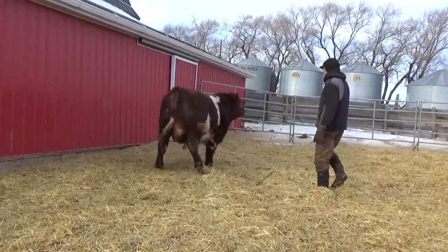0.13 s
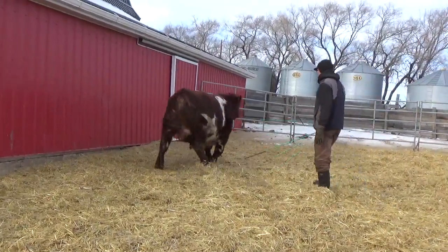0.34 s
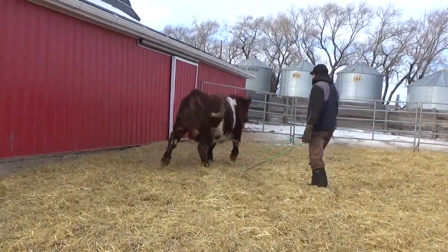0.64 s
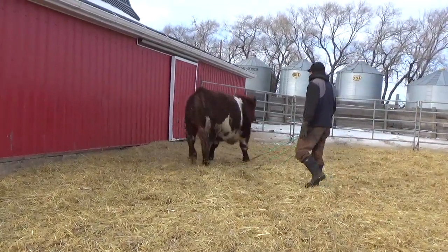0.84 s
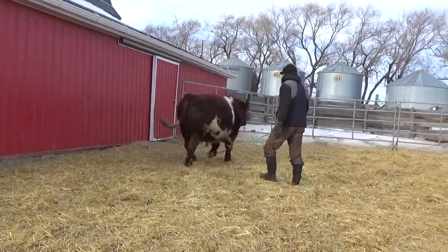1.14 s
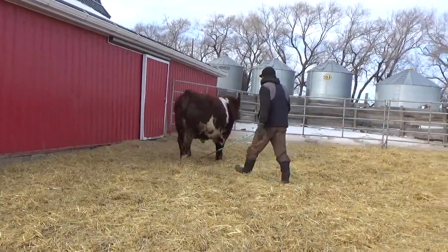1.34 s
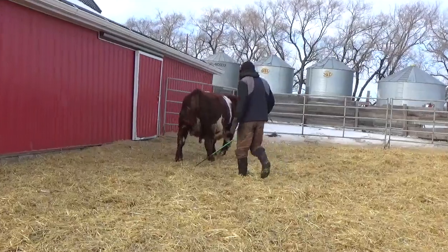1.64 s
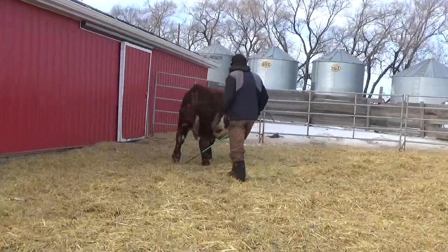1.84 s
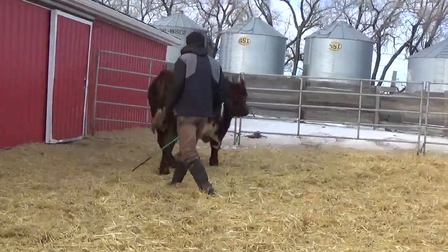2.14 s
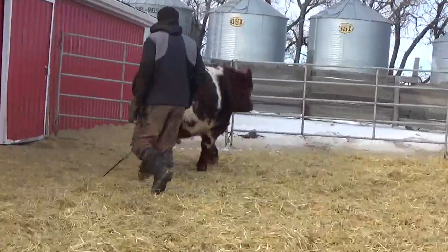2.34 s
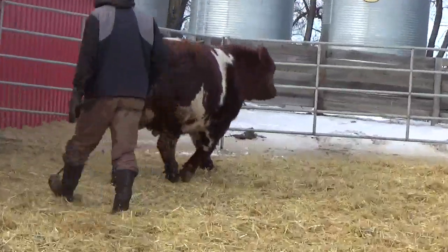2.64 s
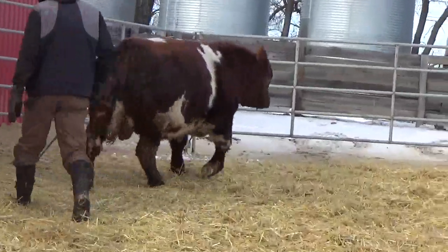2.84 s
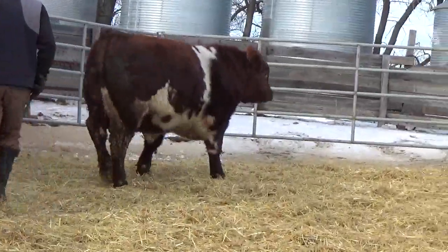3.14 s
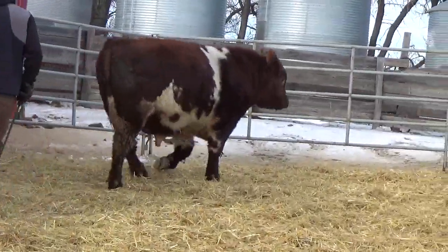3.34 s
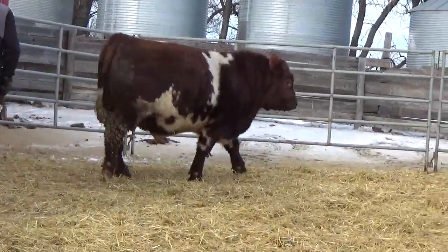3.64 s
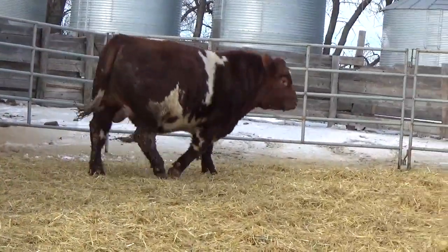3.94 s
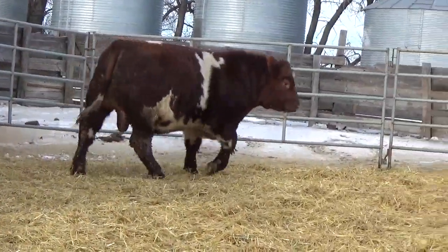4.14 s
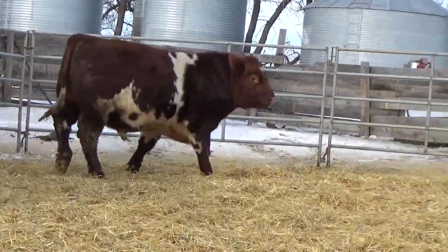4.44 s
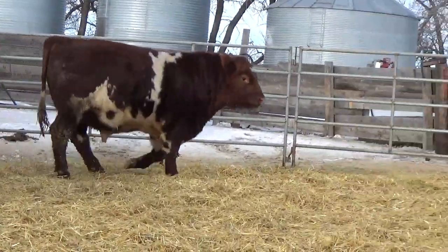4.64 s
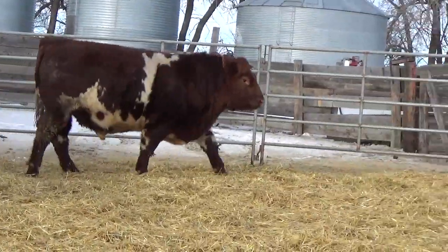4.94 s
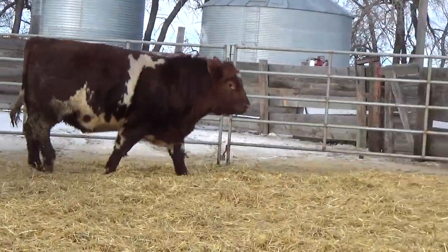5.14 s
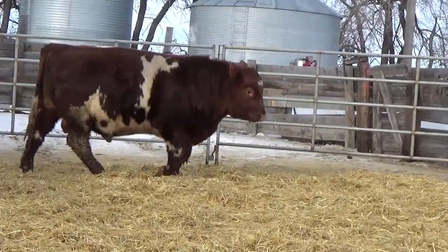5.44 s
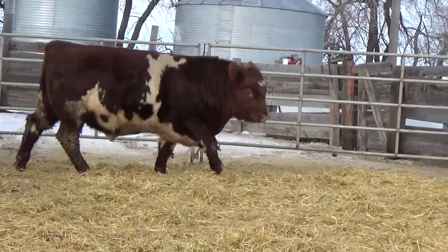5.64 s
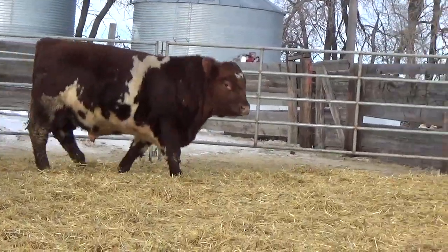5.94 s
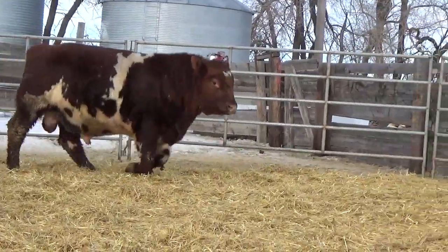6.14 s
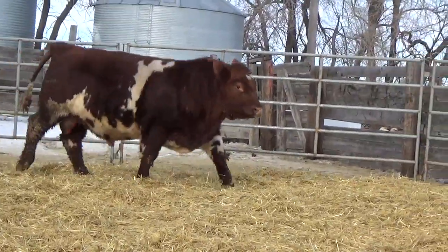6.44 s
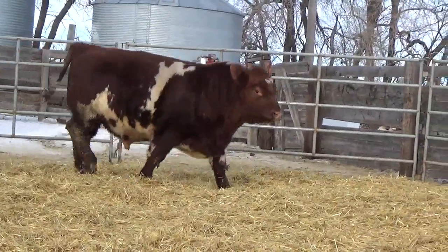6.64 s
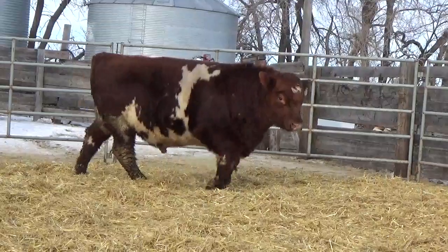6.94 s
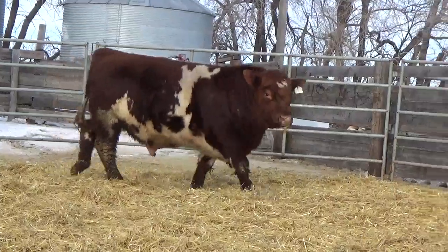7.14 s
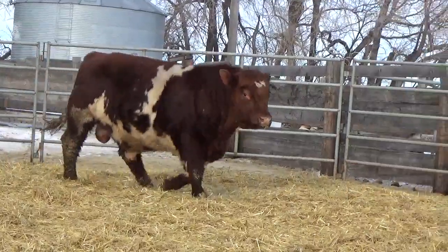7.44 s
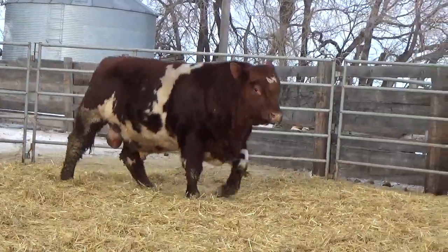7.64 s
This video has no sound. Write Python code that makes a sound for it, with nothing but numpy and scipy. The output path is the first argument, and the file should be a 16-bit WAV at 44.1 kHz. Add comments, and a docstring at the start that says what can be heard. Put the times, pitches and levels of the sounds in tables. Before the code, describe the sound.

A quiet outdoor yard, in stereo, with light wind bumping the microphone. From 0 s, hooves and boots rustle dry straw, with brittle stalks snapping, thickest around 1.3 to 2 s. A stick swishes downward just before 1 s. From 1 to 1.7 s a far bull, left and echoing off sheet-metal walls, slides from a low tone up to a high hollow hoot. A short falling call comes at 2.9 s. From 3.5 to 4.8 s it holds a long, wavering, nearly pure bugle; a sharp rail knock clicks at 4.3 s. Underneath, a nearer bull on the right lows softly, then opens into a rich, full bellow from 4.9 to 5.7 s, ending abruptly, as the far one drops in pitch around 5 s. After a lull of straw steps and a loud snap at 6.2 s, hoarse far calls fall at 6.4 to 6.9 s, then rise and fall until 7.45 s. Faint peeps occur; rustling continues to about 8 s.

```python
"""A straw-bedded yard between sheet-metal walls, in stereo: a far bull bugles in high, nearly pure slides of a few
partials, left and echoing; a nearer one, to the right and drier, lows and rises to a full bellow of many partials.
Hooves and boots rustle the straw (swelling noise bands) and snap stalks (dying noise cracks). A rail is knocked
(ringing modes), a stick swishes once (gliding noise band), something peeps faintly (sine slides), and light wind
touches the microphone (low noise in gusts) over a quiet noise floor."""
import sys
import numpy as np
from scipy import signal
from scipy.io import wavfile
from scipy.ndimage import uniform_filter1d

SR = 44100
rng = np.random.default_rng(int(sys.argv[2]) if len(sys.argv) > 2 else 0)


def wrap_up_sound(samples):
    """Save the sound to the file named by the first command line argument, as 16-bit audio."""
    columns = np.atleast_2d(samples).T
    # keep every value between -1 and 1, then stretch to whole-number steps
    tamed = np.clip(columns, -1, 1)
    steps = np.round(tamed * 32767).astype(np.int16)
    wavfile.write(sys.argv[1], SR, steps)


def invert_db(x):
    """Field ratio 10**(x/20) for x, a level in decibels (scalar or array-like)."""
    u = np.asarray(x, float) / 20
    return 10 ** u


N = 344149


def rms_one(x):
    """Scale to rms 1."""
    return x / np.sqrt(np.mean(x ** 2) + 1e-20)


def in_time(rows):
    """Columns of a curve table at every sample."""
    s, *columns = np.transpose(rows)
    return [np.interp(np.arange(N) / SR, s, c) for c in columns]


def at_hz(points, hz):
    """Read a spectrum on a log-frequency axis."""
    table_hz, values = np.transpose(points)
    return np.interp(np.log(hz), np.log(table_hz), values)


def drift(rate, size=N):
    """Smooth random wander of rms 1: noise through two equal poles at rate (Hz), made every 20 samples."""
    r = np.exp(-40 * np.pi * rate / SR)
    noise = rng.standard_normal(size // 20 + 4002)
    slow = signal.lfilter([1], [1, -2 * r, r * r], noise)[4000:]   # the filter has settled
    return np.interp(np.arange(size) / 20, np.arange(len(slow)), rms_one(slow))


def band(x, low_hz, high_hz):
    """Butterworth band-pass."""
    return signal.sosfilt(signal.butter(2, [low_hz, high_hz], "band", fs=SR, output="sos"), x)


def resonance(x, hz, width):
    """Two-pole peak of gain 1, width in Hz."""
    r = np.exp(-np.pi * width / SR)
    zeros = [(1 - r * r) / 2, 0, (r * r - 1) / 2]
    poles = [1, -2 * r * np.cos(2 * np.pi * hz / SR), r * r]
    return signal.lfilter(zeros, poles, x + 1e-18)


def shaded(x, low_db, high_db, corner_hz):
    """Separate gains below and above a corner, as on the shaded side or off a wall."""
    low_part = signal.sosfilt(signal.butter(1, corner_hz, fs=SR, output="sos"), x)
    return invert_db(low_db) * low_part + invert_db(high_db) * (x - low_part)


# Likeness of left and right in the noise beds. Each row: frequency in Hz, likeness from 0 to 1.
LEFT_RIGHT_LIKENESS = [(60, 0.84), (170, 1), (490, 0.77), (1380, 0.42), (3940, 0.72), (11200, 0.89)]


def banded(spectrum, patchy_db, grain_db):
    """Half-octave bands of stereo noise with own level, flicker and likeness, and a shared graininess; rms 1."""
    out, edges = 0, 45 * 2 ** np.arange(0, 8.6, .5)
    white = rng.standard_normal((2, 2, N)) * invert_db(grain_db * drift(230))   # grains run across all bands
    for k, (low_hz, high_hz) in enumerate(zip(edges, edges[1:])):
        hz = np.sqrt(low_hz * high_hz)
        if at_hz(spectrum, hz) > -40:   # fainter bands are skipped
            mid, side = band(white[k % 2], low_hz, high_hz)
            alike = np.clip(at_hz(LEFT_RIGHT_LIKENESS, hz), 0, 1)
            gain = invert_db(at_hz(spectrum, hz) + patchy_db * drift(5.2))
            stereo = np.sqrt(1 + alike) * mid + np.sqrt(1 - alike) * side * [[1], [-1]]
            out = out + gain * stereo
    return rms_one(out)


# Noise floor of the yard. Each row: frequency in Hz, relative density in dB per Hz.
FLOOR_SPECTRUM = [(35, -48), (60, -6.5), (243, 4), (369, -7.5), (480, 0.5), (2120, -11), (2880, -12),
                  (6480, -10), (9000, -3.5), (11200, -31.5), (14600, -46), (22000, -120)]


def yard_floor():
    """Quiet, patchy noise of the open yard at -63.5 dB rms."""
    return invert_db(-63.5) * banded(FLOOR_SPECTRUM, patchy_db=5.0, grain_db=3.5)


# Gusts on the microphone. Each row: centre in seconds, peak in dB before flicker, swell in seconds (to 1/e).
GUSTS = [(.61, -75, .15), (1.74, -65.5, .1), (3.8, -76, 0.41), (4.55, -73, 0.29), (5.2, -66, 0.052),
         (6.3, -78.5, 0.25), (6.89, -82, 0.039), (7.12, -72, 0.092), (7.38, -67, 0.14)]
CALM_DB = -81.5   # wind between the gusts, before flicker


def wind():
    """Low noise, mostly alike on both sides, in bell-shaped swells over a calm bed; its level flickers."""
    t = np.arange(N) / SR
    swells = sum(invert_db(db) * np.exp(-((t - s) / swell) ** 2) for s, db, swell in GUSTS)
    flicker = invert_db(2.2 * drift(5.2))
    shared = band(band(rng.standard_normal(N), 36, 173), 39, 183)
    apart = band(rng.standard_normal((2, N)), 22, 100)
    return (invert_db(CALM_DB) + swells) * flicker * rms_one(shared + 0.11 * apart)


# Single echoes off the walls. Each row: delay in seconds, left level in dB, right level in dB.
WALL_ECHOES = [(.021, -8, -8.5), (.047, -10.5, -11), (.078, -13.5, -16), (.105, -18, -17),
               (.16, -22.5, -24.5), (.24, -23.5, -23)]
YARD_T60_S, WALL_CUT_HZ = 0.48, 1900   # decay of the lowest tones; low-pass on every round


def yard(x):
    """A few single echoes, then feedback delays that dull on every round."""
    out, dull = np.zeros((2, N)), np.exp(-2 * np.pi * WALL_CUT_HZ / SR)
    for delay_s, *sides_db in WALL_ECHOES:
        lag = round(delay_s * SR)
        out[:, lag:] += invert_db(sides_db)[:, None] * x[:N - lag]
    for k, lag in enumerate((rng.uniform(.04, .11, 12) * SR).astype(int)):
        loop, gain, state = x.copy(), invert_db(-60 * lag / SR / YARD_T60_S), [0.]
        for i in range(lag, N, lag):
            back, state = signal.lfilter([gain * (1 - dull)], [1, -dull], loop[i - lag:i], zi=state)
            loop[i:i + lag] += back[:N - i]
        sign = (-1) ** (k // 2)
        out[k % 2] += invert_db(-13.5) * (loop - x) * sign
    return out


# Faint peeps. Each row: start in seconds, length in seconds, start pitch in Hz, end pitch in Hz,
# level in dB before the wavering.
PEEPS = [(1.05, 0.065, 2860, 2850, -66), (2.4, 0.071, 2950, 2940, -67), (2.735, 0.059, 2950, 2800, -62.5),
         (3.43, 0.022, 490, 497, -53), (3.664, 0.145, 2470, 2330, -61), (6.218, 0.19, 2540, 2460, -66)]


def peeps():
    """Short sine slides of wavering level."""
    out = np.zeros(N)
    for s, length, start_hz, end_hz, level_db in PEEPS:
        size, at = round(length * SR), round(s * SR)
        phase = 2 * np.pi * np.cumsum(np.linspace(start_hz, end_hz, size)) / SR
        level = invert_db(level_db + 3.1 * drift(33, size=size))
        out[at:at + size] += level * np.hanning(size) ** .5 * np.sin(phase)
    return out


# The swung stick. Each row: time in seconds, band centre in Hz, level in dB before the band's weighting.
SWISH = [(.84, 4600, -74), (.875, 3930, -57), (.92, 2880, -62.5), (.95, 1490, -49.5), (.98, 875, -52),
         (1.0, 600, -65)]


def swish():
    """Air noise of a swung stick: a band, narrow above 2500 Hz, whose centre falls as the stick slows."""
    before = (0, SWISH[0][1], -120)
    after = (SWISH[-1][0] + .02, SWISH[-1][1], -120)
    hz, level_db = in_time([before, *SWISH, after])
    noise, out = rng.standard_normal(N), 0
    width = np.where(hz > 2500, .08, .7)   # in log frequency
    for c in np.geomspace(500, 5000, 20):
        weight = np.exp(-(np.log(hz / c) / width) ** 2)
        out = out + weight * rms_one(band(noise, c / 1.08, c * 1.077))
    return invert_db(level_db) * out


# Feet drag through and leave the straw. Each row: time in seconds, rustle peak in dB, rise and fall in
# seconds per 10 dB (their signs are ignored), crunch in dB against the rustle.
STEPS = [(0.0, -60.5, .02, 1.2, -7.5), (.32, -46, 0.1, 0.18, -14), (.82, -58, 0.04, 0.55, -3),
         (1.32, -50, 0.1, 0.2, -14), (1.52, -49, .08, 0.11, -10.5), (1.74, -50, 0.03, .04, -9.5),
         (2.0, -51.5, 0.26, 0.06, -18), (2.17, -59.5, 0.4, 0.2, -1.5), (2.32, -55, 0, 0.07, -3),
         (2.69, -55.5, 0.4, 0.13, -7.5), (2.85, -59.5, 0.13, 0.12, 1.5), (3.35, -57, -0.03, 0, -8),
         (3.5, -64, 0.06, .08, 1), (3.66, -56, .07, -0.33, -1), (3.73, -59, 0.07, .07, 2),
         (3.836, -54, .03, -0.15, -5), (3.93, -65, -0.7, 0.7, 1), (4.13, -65, 0.14, 0.16, 6.5),
         (4.5, -56.5, -0.15, 0, -5.5), (4.63, -56, -0.05, 0.2, -0.5), (5.15, -59, -0.6, .2, -6),
         (5.33, -54, .1, .17, 1), (5.6, -55.5, .06, .25, -5), (5.73, -56, -0.25, 0.1, -8),
         (5.9, -55.5, 0.2, 0.16, -6), (6.01, -52, -0.7, 0.01, -6.5), (6.099, -54, -0.03, 0.14, -6.5),
         (6.36, -57.5, 0, 0.1, -9), (6.75, -53.5, 0.1, 0.03, -15), (6.89, -58.5, 0.64, .12, -3),
         (7.14, -48.5, -0.06, -0.03, -8.5), (7.45, -56, 0.44, 0.7, -3)]
# Feet come down hard on the straw. Each row: time in seconds, rustle peak in dB, fall in seconds per 10 dB
# (its sign is ignored), crunch in dB against the rustle.
LANDINGS = [(.218, -44, .045, -21), (0.747, -45, 0.03, -21), (1.81, -54, 0.15, -7),
            (2.405, -51.5, 0.24, -16.5), (2.99, -57.5, 0.14, -8), (3.135, -54.5, 0.1, -3.5),
            (3.299, -59.5, -1.3, -8), (4.273, -53.5, 0.16, -8.5), (4.865, -54, 0.3, -7),
            (7.35, -51.5, 0.1, -13)]
LANDING_RISE_S = .004   # per 10 dB


def steps():
    """Levels of rustle and crunch: every step swells and fades straight in dB, steps add in power."""
    landings = [(s, db, LANDING_RISE_S, *rest) for s, db, *rest in LANDINGS]
    s, peak_db, rise, fall, crunch_db = np.transpose([*STEPS, *landings])[:, :, None]
    t = np.arange(0, N + 100, 100) / SR   # one level every 100 samples
    below_peak_db = 10 * np.maximum((s - t) / np.abs(rise), (t - s) / np.abs(fall))
    rustle_power = invert_db(peak_db - below_peak_db) ** 2
    crunch_power = rustle_power * invert_db(crunch_db) ** 2
    return [np.interp(np.arange(N) / SR, t, np.sqrt(p.sum(axis=0))) for p in (rustle_power, crunch_power)]


# Bright rustle of the straw. Each row: frequency in Hz, relative density in dB per Hz.
RUSTLE_SPECTRUM = [(2060, -25.5), (3500, -1.5), (4130, -13.5), (5290, 6.5), (9000, -0.5), (10600, 4),
                   (11200, -30), (14600, -48), (22000, -120)]
# Lower crunch of the straw. Each row: frequency in Hz, relative density in dB per Hz.
CRUNCH_SPECTRUM = [(300, -5), (700, 0), (1500, 1), (2500, -1), (4000, 2), (5500, -11.5), (11000, -14)]


def straw():
    """Stalks rub and crackle under the feet: grainy noise of two colours follows the steps."""
    rustle, crunch = steps()
    rubbed = rustle * banded(RUSTLE_SPECTRUM, patchy_db=1.64, grain_db=1.35)
    return rubbed + crunch * banded(CRUNCH_SPECTRUM, patchy_db=0.0, grain_db=1.5)


# Stalks snap under a step. Each row: time in seconds, crack peak in dB before panning, pitch in Hz,
# thud in dB against the crack's peak.
SNAPS = [(0.0964, -55, 2510, -8), (0.2169, -53, 5450, -30), (0.3798, -46.5, 5670, -2.5),
         (0.7452, -52, 6000, -28), (1.2606, -44, 1630, -14), (1.2955, -53, 3000, -14),
         (1.401, -40.5, 2620, -9), (1.4696, -37, 3050, -8), (1.8005, -46, 6060, -13),
         (1.8482, -37.5, 5050, -7), (1.9402, -42.5, 5000, 1.5), (2.1724, -46, 1530, -16),
         (2.3444, -50.5, 2820, 1), (2.4019, -47, 5550, -21), (2.9261, -42, 5870, -5.5),
         (3.1807, -44.5, 4960, -10), (3.8354, -46, 4000, -10), (4.128, -46, 1390, -22),
         (4.4074, -44, 3530, 2), (4.5034, -48, 1700, -22), (4.6129, -42, 3100, -23),
         (6.2053, -36, 3220, -30), (6.8718, -45, 1380, -21), (7.0823, -46.5, 1920, -9),
         (7.7169, -43.5, 1880, -12)]
SNAP_T60_S, SMALL_SNAPS = 0.021, 12


def snaps():
    """Each snap is a dying noise crack, coloured around its pitch, over the dull thud of the step."""
    out, t = np.zeros((2, N)), np.arange(SR // 10) / SR
    # weaker snaps fall at random: columns as in SNAPS, lowest values + ranges
    small = [0, -58.5, 1500, -25] + rng.random((SMALL_SNAPS, 4)) * [N / SR, 6, 4500, 25]
    for s, peak_db, hz, thud_db in [*SNAPS, *small]:
        burst = rng.standard_normal(len(t)) * invert_db(-60 * t / SNAP_T60_S)
        crack = band(burst, 0.55 * hz, 1.21 * hz) + 0.16 * band(burst, 1000, 5400)
        thud = band(burst, 140, 1550)
        snap = crack / np.abs(crack).max() + invert_db(thud_db) * thud / np.abs(thud).max()
        at = round(s * SR)
        side = invert_db(rng.normal(0, 4.3) * np.array([[1], [-1]]))   # random place, left to right
        out[:, at:at + len(t)] += (side * invert_db(peak_db) * snap)[:, :N - at]
    return out


# Modes of the rail. Each row: frequency in Hz, relative level in dB, time to fall 60 dB in seconds.
RAIL_MODES = [(934, 6, 0.039), (1482, -19, 0.037), (2480, -2, .025), (3850, -1, 0.013), (4700, -1, 0.012),
              (8000, -4, 0.01)]
KNOCK_S, KNOCK_DB = 4.3405, -24.5   # time of the blow; level that the touches and the crack lie below


def knock():
    """A hoof or the stick strikes a rail: a light touch, a sharp blow and two rebounds ring its modes."""
    out, t = np.zeros(N), np.arange(SR // 10) / SR
    ring = sum(invert_db(db - 60 * t / t60) * np.sin(2 * np.pi * hz * t) for hz, db, t60 in RAIL_MODES)
    for delay_s, touch_db in [(-.011, -10), (0, -1), (.0035, -13), (.014, -29)]:
        at = round((KNOCK_S + delay_s) * SR)
        out[at:at + len(t)] += invert_db(KNOCK_DB + touch_db) * ring / np.abs(ring).max()
    at = round(KNOCK_S * SR)
    splinter = band(rng.standard_normal(len(t)), 570, 4300)   # splintery crack of the blow
    out[at:at + len(t)] += invert_db(KNOCK_DB - 5 - 60 * t / 0.067) * splinter
    return out


def throat_noise(throat, slope_db, size):
    """Breath rings in each throat resonance, weighted by a slope in dB per octave; rms 1."""
    noise = rng.standard_normal(size)
    rings = [(-1) ** k * invert_db(slope_db * np.log2(hz)) * resonance(noise, hz, width)
             for k, (hz, width, _) in enumerate(throat)]
    return rms_one(sum(rings))


MOUTH_OPENS_S = 4.88, 5.25   # start and end of the opening
GLIDE_LOSS_DB = 1.1   # overtone slope lost per octave a second of glide


def voice(rows, throat, count, nose=(), wobble=0, boost=0):
    """Partials on the pitch, shaped by source slope and throat.

    Returns samples, phase, partials, envelope and any further columns of rows."""
    s, *columns = np.transpose(rows)
    span = np.arange(int(s[0] * SR), int(s[-1] * SR))
    t = span / SR
    hz, level_db, slope_db, *more = [np.interp(t, s, c) for c in columns]
    wobble = np.broadcast_to(wobble, N)[span]
    phase = 2 * np.pi * np.cumsum(hz * (1 + wobble * drift(40, size=len(t)))) / SR
    k = np.arange(1, count + 1)[:, None]
    closed = np.clip((MOUTH_OPENS_S[1] - t) / np.ptp(MOUTH_OPENS_S), 0, 1)
    shapes = [*throat, *[(centre, width, db * closed) for centre, width, db in nose]]
    glide = uniform_filter1d(np.abs(np.gradient(np.log2(hz))) * SR, size=600)   # octaves a second
    slope_db = slope_db - GLIDE_LOSS_DB * np.minimum(glide, 15)   # slack folds in a fast slide lose overtones
    lift_db = sum(db / (1 + (2 * (k * hz - centre) / width) ** 2) for centre, width, db in shapes)
    partial_db = lift_db - lift_db[0] + slope_db * np.log2(k)   # against the lowest partial
    partials = invert_db(partial_db) * np.sin(k * (phase + 0.256 * k))
    fade = np.clip(np.minimum(t - s[0], s[-1] - t) / 0.0043, 0, 1)
    return span, phase, partials, fade * invert_db(level_db + boost * lift_db[0]), more


# The near bull's call. Each row: time in seconds, pitch in Hz, lowest partial in dB before the mix,
# overtone slope in dB per octave before glide loss, breath in dB against the lowest partial.
NEAR_CALL = [(3.5, 84.1, -77, -0.5, -23), (3.75, 101.2, -67, -6, -28), (3.93, 109.3, -64, -5.5, -30),
             (4.11, 119.8, -66, -1, -28), (4.54, 132.2, -67, -1.5, -28), (4.72, 135.5, -65.5, 0, -28),
             (4.9, 151.8, -55, 0, -11), (5.01, 189.3, -41.5, -3.5, -16), (5.05, 209.1, -37.5, -5, -22),
             (5.11, 242.1, -37, -3, -43), (5.2, 276.4, -38, -4.5, -43), (5.3, 291.3, -39.5, -3, -17),
             (5.4, 292, -33.5, -3, -21.5), (5.55, 292.6, -31, -4, -20.5), (5.61, 276, -31, -2, -20),
             (5.63, 262.6, -24.5, -3.5, -26), (5.66, 221.2, -27, -1.5, -47), (5.68, 223.4, -34, -10.5, -40),
             (5.7, 215, -55, -18, -30)]
# Near throat resonances. Each row: centre in Hz, width in Hz, lift in dB.
NEAR_THROAT = [(235.4, 160, 8.5), (517, 97, 5.5), (833.3, 240, 7), (1190, 88, 9.5), (1700, 202, 8.5),
               (2052, 33, 5.5), (2522, 120, 14.5), (3220, 150, 11), (4870, 6400, -39)]
# A closed mouth swallows some overtones and the nose lifts others. Each row: centre in Hz, width in Hz,
# lift in dB with the mouth shut.
CLOSED_MOUTH = [(800, 500, -6), (1550, 700, 12), (2800, 1000, -26)]


def low():
    """Near bull: a full stack of partials, nasal until the mouth opens, with breath puffed once a cycle."""
    out = np.zeros(N)
    span, phase, partials, envelope, (breath_db,) = voice(
        NEAR_CALL, NEAR_THROAT, count=20, nose=CLOSED_MOUTH, wobble=0.0017)
    shimmer = invert_db([0.97 * drift(3.5, size=len(span)) for _ in partials])
    tone = np.sqrt(2) * (shimmer * partials).sum(axis=0)
    puffs = throat_noise(NEAR_THROAT[2:6], slope_db=-3.0, size=len(span)) * (1 + 1.76 * np.sin(phase))
    out[span] = envelope * (tone + invert_db(breath_db) * puffs)
    return out


# The far bull, one table a call. Each row: time in seconds, pitch in Hz, effort in dB before throat boost
# and mix, overtone slope in dB per octave before the losses of glide and roughness.
FAR_CALLS = [
    [(0.96, 107.4, -65, -5), (0.992, 118.7, -57.5, -9.5), (1.05, 145, -55, -7), (1.122, 163, -53, -8),
     (1.138, 177, -53, -12), (1.148, 206.4, -43.5, -10), (1.206, 268.5, -49, -11.5),
     (1.26, 293.3, -43, -22), (1.322, 296.4, -37.5, -24), (1.362, 349, -47.5, -39), (1.41, 408, -40.5, -37),
     (1.452, 472.4, -42.5, -27), (1.532, 486.4, -54, -21), (1.558, 506, -46, -27), (1.606, 484, -57.5, -22),
     (1.72, 505, -81, -15)],
    [(2.83, 712, -79, -11), (2.866, 503, -49, -5), (2.886, 269.5, -51.5, 2.5), (2.924, 219, -55.5, 3),
     (2.95, 163, -57, -21)],
    [(3.535, 618, -71, -15), (3.556, 445, -57.5, -24), (3.6, 433.4, -45.5, -24), (3.635, 451.6, -53, -17),
     (3.702, 467.5, -45, -12), (3.79, 457, -51, -13.5), (3.85, 468.4, -40.5, -14.5), (3.88, 484, -58, -1),
     (3.92, 557.2, -40, -9), (3.976, 562.8, -34.5, -15.5), (4.036, 567, -46.5, -8), (4.06, 562.7, -40, -28),
     (4.122, 577.8, -37.5, -23.5), (4.228, 586, -38, -26), (4.308, 575.2, -34, -33), (4.345, 536, -57, -20),
     (4.37, 542.5, -40.5, -22), (4.397, 536, -47.5, -31), (4.435, 534.3, -66, -1), (4.455, 547.2, -47, -4),
     (4.485, 558.3, -48.5, -21), (4.547, 568, -66, -2), (4.587, 568.6, -43, -10), (4.68, 574, -46.5, -10.5),
     (4.765, 568, -42.5, -15), (4.81, 568, -62, -8)],
    [(4.86, 834, -63, -13), (4.9, 815, -48.5, -5), (5.026, 787, -46, -8), (5.082, 726.7, -41, -9),
     (5.102, 590.5, -52, -25.5), (5.132, 374.7, -49.5, -30), (5.148, 282, -53, -25), (5.2, 188, -45, -15)],
    [(6.3, 768, -86, -18), (6.336, 756, -68.5, -31), (6.44, 800, -59, -8.5), (6.564, 788, -57, -7),
     (6.654, 686, -52, -14), (6.692, 513, -54.5, -1.5), (6.736, 527.7, -46, -9), (6.746, 483.5, -51, 10),
     (6.752, 370.6, -51, 3), (6.772, 286, -51, 5), (6.792, 254.3, -46, -22), (6.826, 199.5, -44.5, -1.5),
     (6.87, 152, -74, -10)],
    [(6.93, 192.6, -51, -21), (6.988, 247.8, -58, -7), (7.064, 411, -51, -5), (7.078, 432, -62, -4),
     (7.086, 551.5, -53, -11), (7.204, 533.2, -45.5, -10), (7.25, 522, -53, -9), (7.285, 510, -51, -8),
     (7.302, 460, -58, -6), (7.31, 351, -46, -3), (7.33, 300, -49, -4), (7.356, 241, -45, -10),
     (7.396, 185.2, -54, -0.5), (7.45, 111.9, -57, -22.5)],
]
# Far throat resonances. Each row: centre in Hz, width in Hz, lift in dB.
FAR_THROAT = [(258.4, 55, 23), (526.6, 104.6, 24), (883, 320, 8.5), (1199, 217, 13), (1490, 120, 11.5),
              (2390, 22, 9.5), (2813, 46, 25.5), (3520, 46, 11)]
# Hoarse spells. Each row: start in seconds, end in seconds, roughness from 0 to 1 before smoothing.
HOARSE_SPELLS = [(.95, 1.6, .14), (1.6, 1.75, .3), (2.8, 3.0, .25), (3.5, 3.575, 1), (4.35, 4.57, .2),
                 (4.85, 5.07, .45), (5.08, 5.15, .75), (5.15, 5.22, .4), (6.45, 6.675, .7),
                 (6.75, 7.07, .26), (7.295, 7.46, .28)]
CLEAR_ROUGHNESS = .06   # outside the hoarse spells
THROAT_BOOST = 0.57   # share of the throat's lift that also swells the lowest partial
# breath at no roughness, what full roughness adds, and what it does to the overtone slope per octave (dB)
FAR_BREATH_DB, HOARSE_BREATH_DB, HOARSE_SLOPE_DB = -36, 31, -4


def bugle():
    """Far bull: nearly pure slides; where rough, every partial flutters and breath rings in the throat."""
    out, roughness = np.zeros(N), np.full(N, CLEAR_ROUGHNESS)
    for start, end, amount in HOARSE_SPELLS:
        roughness[int(start * SR):int(end * SR)] = amount
    roughness = uniform_filter1d(roughness, size=1500)
    for call in FAR_CALLS:
        span, _, partials, envelope, _ = voice(
            call, FAR_THROAT, count=7, boost=THROAT_BOOST, wobble=0.036 * roughness ** 2)
        rough, size = roughness[span], len(span)
        dulled = invert_db(HOARSE_SLOPE_DB * rough * np.log2(np.arange(1, 8))[:, None])
        shared = drift(40.0, size=size)   # flutter common to all partials
        flutter = [1 - 0.37 * rough + 1.16 * rough * (shared + 0.75 * drift(45, size=size)) for _ in partials]
        tone = np.sqrt(2) * (flutter * partials * dulled).sum(axis=0)
        breath_level = invert_db(FAR_BREATH_DB + HOARSE_BREATH_DB * np.sqrt(rough))
        breath = breath_level * throat_noise(FAR_THROAT[:6], slope_db=-0.5, size=size)
        out[span] += envelope * (tone + breath)
    return out


# What the sheds return best of the far calls. Each row: frequency in Hz, width in Hz, level in dB.
SHED_RINGS = [(228, 83, -1.5), (524, 54, -5)]


def cattle():
    """Far bull to the left and wet, near bull to the right and drier, both with the yard's echoes."""
    far, near = bugle(), low()
    samples = np.arange(N)
    bounce = np.interp(samples - 0.00056 * SR, samples, near)   # a close surface combs the left side
    left = invert_db(0.5) * far + shaded(near + .5 * bounce, low_db=-1.0, high_db=-8.0, corner_hz=600)
    right = shaded(far, low_db=0.0, high_db=-10.0, corner_hz=428) + invert_db(2.5) * near
    far_sent = invert_db(-13) * far + sum(invert_db(db) * resonance(far, hz, width) for hz, width, db in SHED_RINGS)
    near_sent = shaded(near, low_db=-8.0, high_db=0.0, corner_hz=504)
    return np.array([left, right]) + yard(far_sent + near_sent)


def scene():
    """The yard's floor and wind, the small sounds, the straw, the rail and the cattle together."""
    background = yard_floor() + wind()
    return background + peeps() + swish() + straw() + snaps() + knock() + cattle()


def low_pass(x):
    """Removes everything above the highest recorded frequency."""
    return signal.sosfilt(signal.butter(12, 11800, fs=SR, output="sos"), x)


def record(dry):
    """The microphone capsule lifts a treble peak, then the top is cut steeply at 10980 Hz."""
    lifted = dry + invert_db(-4.5) * resonance(dry, hz=8730, width=890)
    mix = signal.sosfilt(signal.ellip(12, .3, 80, 10980, fs=SR, output="sos"), lifted)
    return low_pass(mix)


dry = scene()
out = record(dry)
wrap_up_sound(out)
```